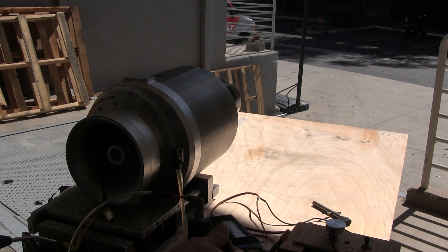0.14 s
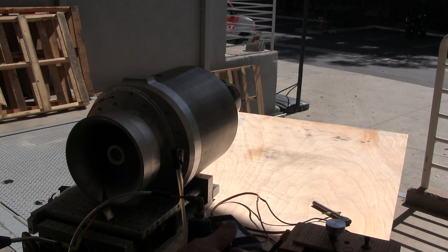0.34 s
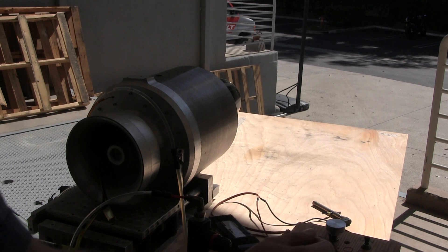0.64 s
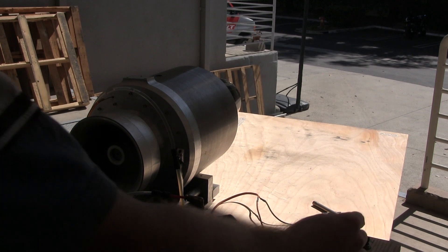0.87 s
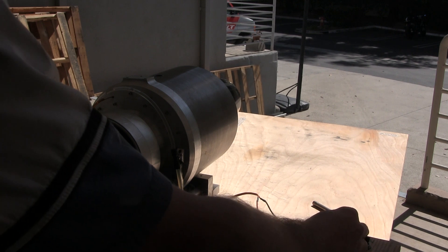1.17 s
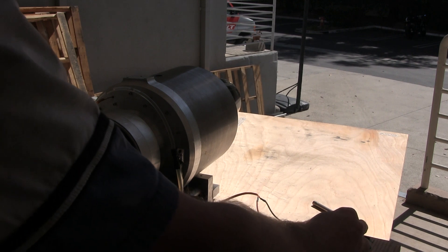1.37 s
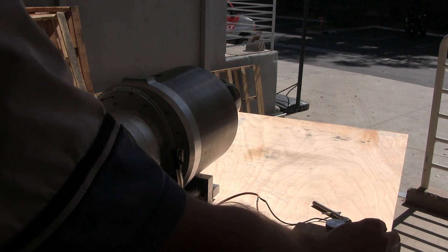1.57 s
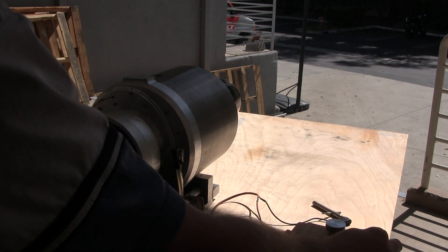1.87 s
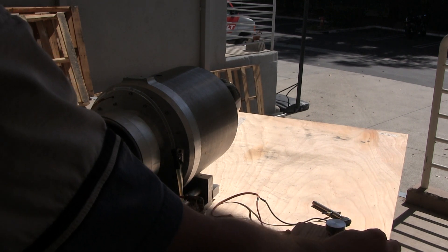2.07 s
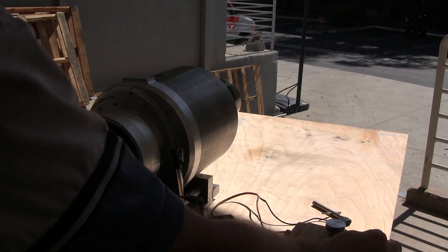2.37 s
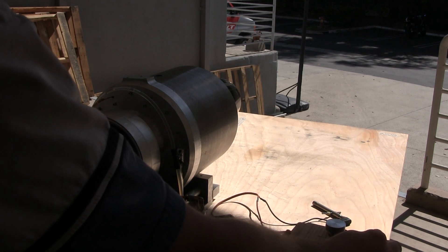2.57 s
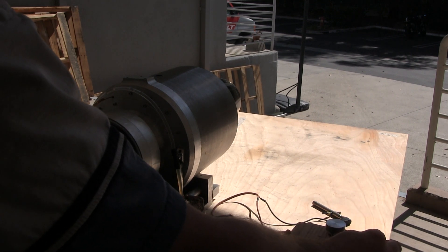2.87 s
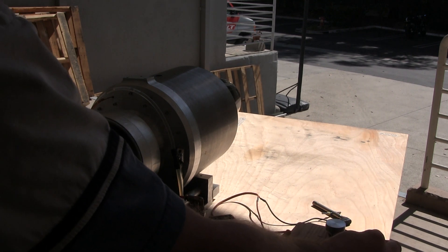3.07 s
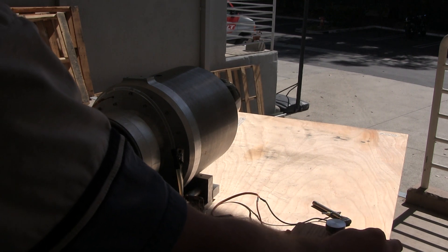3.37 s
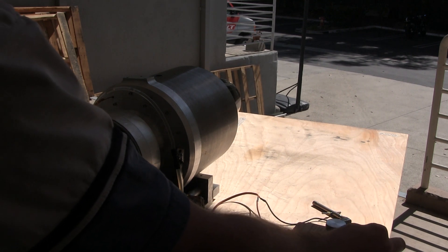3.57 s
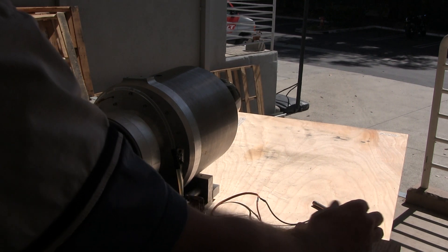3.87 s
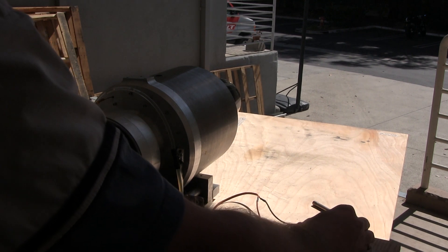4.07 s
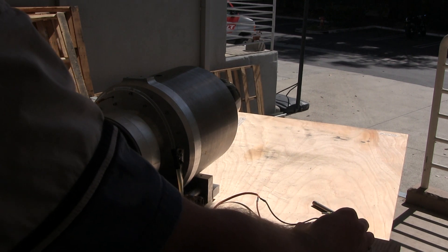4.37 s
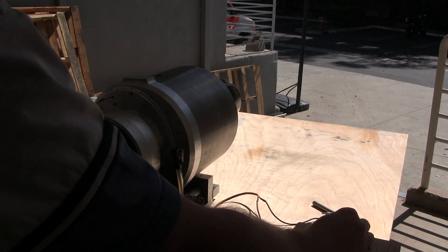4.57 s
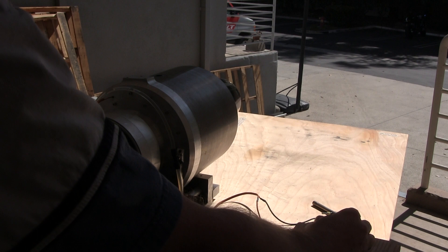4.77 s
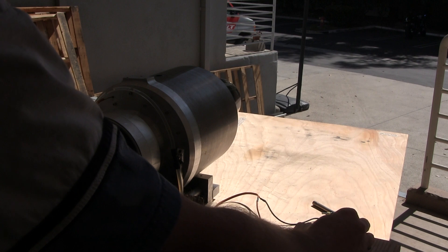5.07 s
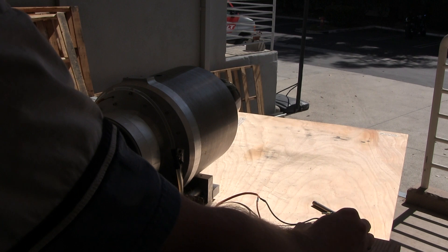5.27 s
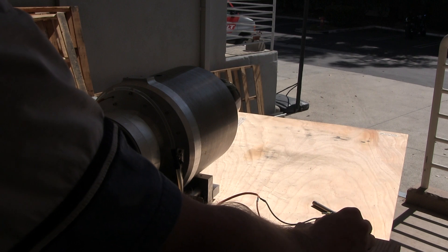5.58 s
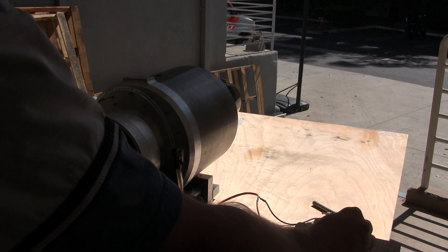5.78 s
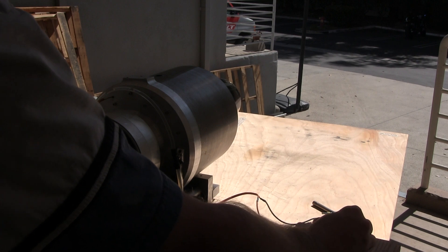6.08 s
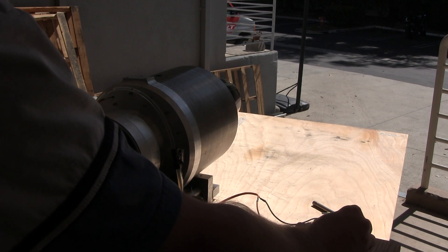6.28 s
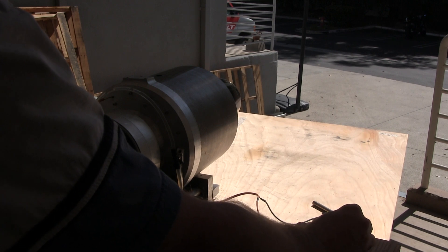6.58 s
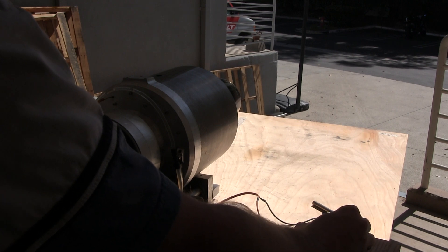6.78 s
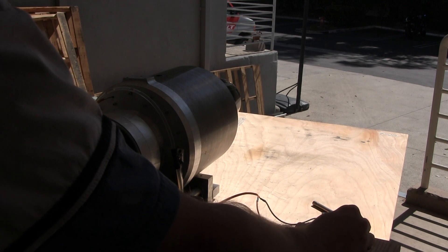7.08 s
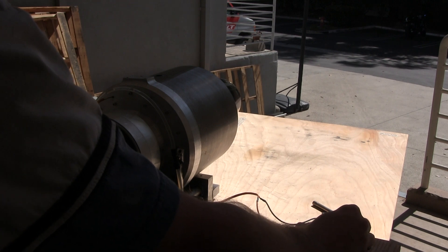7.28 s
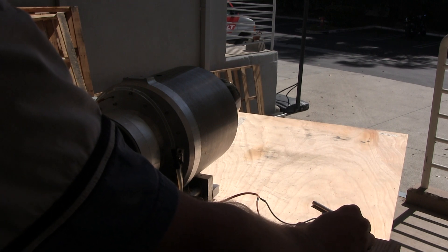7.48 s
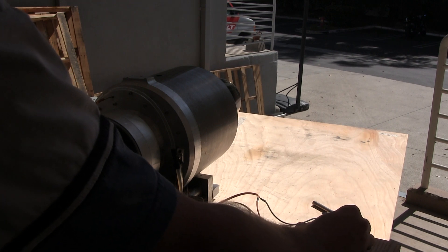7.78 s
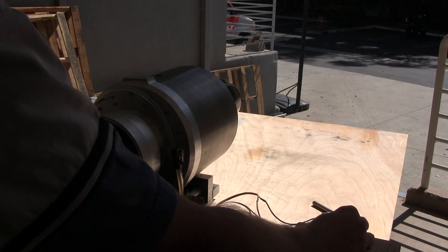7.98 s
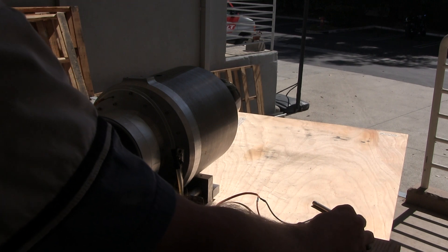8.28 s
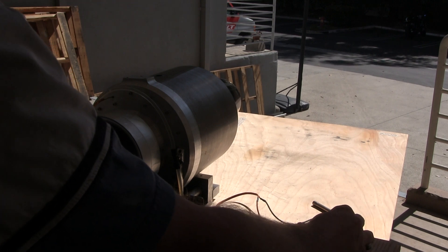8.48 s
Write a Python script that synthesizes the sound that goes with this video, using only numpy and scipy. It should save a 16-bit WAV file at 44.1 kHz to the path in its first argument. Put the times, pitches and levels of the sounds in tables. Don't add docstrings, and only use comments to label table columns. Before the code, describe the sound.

Continuous compressed-air hiss, wide and fluttering in the treble, covers a turbine's rush and soft burner rumble. After a small wooden knock, the tone shifts as a body leans in near the microphones. A thin, multi-toned whine glides upward throughout, briefly muffled then stronger, swelling as it passes resonances. Outdoors, an arm's length away, little echo, engine slightly left.

```python
import sys
import numpy as np
from scipy import signal
from scipy.fft import rfft, irfft, next_fast_len
from scipy.io import wavfile
from scipy.ndimage import uniform_filter1d

SR = 44100
rng = np.random.default_rng(int(sys.argv[2]) if len(sys.argv) > 2 else 0)


def dump_mix(stems):
    frames = np.atleast_2d(stems).T
    limited = np.clip(frames, -1, 1)
    pcm = np.round(limited * 32767).astype(np.int16)
    wavfile.write(sys.argv[1], SR, pcm)


def gain_from_db(level_db):
    decades = np.asarray(level_db, float) / 20
    return 10 ** decades


N = 381024
T = np.arange(N) / SR
SPOOL = T / T[-1]
SIZE = next_fast_len(N)
HZ = np.arange(SIZE // 2 + 1) * SR / SIZE
ARM_IN_S = 0.67
SINCE_ARM = np.maximum(T - ARM_IN_S, 0)


def on_axis(points, column=1):
    rows = np.array(points, float)
    return np.interp(np.log(HZ + 1), np.log(rows[:, 0]), rows[:, column])


def bell(x, centre, width):
    return np.exp(-0.5 * ((x - centre) / width) ** 2)


def response(points, bumps):
    db = on_axis(points) + sum(peak_db * bell(HZ, hz, width / 2) for hz, width, peak_db in bumps)
    return gain_from_db(db) / np.sqrt(np.mean(gain_from_db(db) ** 2))


def through(x, gain):
    return irfft(rfft(x, SIZE) * gain, SIZE)[..., :N]


def walk(rate_hz):
    hold = int(SR / rate_hz)
    steps = np.repeat(rng.standard_normal(N // hold + 1), hold)
    return 1.38 * uniform_filter1d(uniform_filter1d(steps, hold), hold)[:N]


def swells_db(events, width_s):
    return sum(db * bell(T, s, width_s) for s, db in events)


def knock():
    # start in seconds, peak level in dB, mode in Hz, time to fall 60 dB in seconds.
    board_modes = [
        (.4752, -17, 750, .007),
        (.4752, -27, 260, .03),
    ]
    out, t = np.zeros(N), np.arange(2000) / SR
    for s, db, hz, t60 in board_modes:
        decay = np.exp(-np.log(1000) * t / t60)
        onset = np.minimum(t / 0.0002, 1)
        start = int(s * SR)
        out[start:start + len(t)] += gain_from_db(db) * np.cos(2 * np.pi * hz * t - 0.8) * decay * onset
    return through(out, HZ ** 2 / (HZ ** 2 + 170 ** 2))


def casing_ring():
    # resonance in Hz, width in Hz, level in dB.
    resonances = [(251, 24, -44), (285, 23, -43), (310, 18, -45), (327, 14, -52), (356, 23, -51),
                  (514, 63, -43), (622, 57, -42.5), (677, 50, -40.5), (714, 11, -40.5), (750, 46, -40),
                  (811, 24, -48), (897, 32, -48.5), (940, 21, -59), (1030, 127, -43.5), (1242, 148, -35),
                  (1419, 110, -41.5), (1620, 270, -41.5), (1840, 130, -48), (1873, 210, -38),
                  (2163, 110, -45.5), (2285, 80, -50), (2540, 160, -44), (2640, 71, -55),
                  (2747, 154, -39.5), (2903, 175, -38.5), (3100, 340, -46), (3320, 310, -43.5)]
    # notch in Hz, width in Hz.
    nulls = [(294, 7), (318, 8), (572, 17), (880, 14), (1130, 16), (1470, 25), (2190, 70), (2410, 19),
             (2840, 30)]
    ring = np.sqrt(sum(gain_from_db(2 * db) / (1 + ((HZ - hz) / (width / 2)) ** 2) ** 2
                       for hz, width, db in resonances))
    for hz, width in nulls:
        ring = ring * (1 - 0.8 / (1 + ((HZ - hz) / (width / 2)) ** 2))
    return ring


def whine(cover):
    # multiple of shaft speed,
    # level in the open in dB, level behind the arm in dB, rise over the spool-up in dB.
    orders = [(.897, -58, -8.5, -1), (1, -44.5, 1.5, -7.5), (1.115, -62, -13.5, 8), (2, -51, 1.5, -3.5),
              (3, -45, 1.5, 1.5), (4, -51, -2, 2), (5, -55.5, -3, 4.5), (6, -54, -6, 9.5),
              (7, -47.5, 1, -1.5), (8, -44, -4.5, 5), (9, -66, -3.5, 2.5), (10, -48.5, -8.5, 6.5),
              (11, -58, -2, -1)]
    # centre in seconds, swell in dB.
    whine_swells = [
        (2.5, 1.6),
        (5.2, -0.9),
        (6.3, 2),
        (8.6, -1),
    ]
    top_speed_hz, spun_for_s, spool_s = 470.92, 10.405, 19.068
    hz = top_speed_hz * np.tanh((T + spun_for_s) / spool_s) * (1 + 0.0003 * walk(20))
    turns = np.cumsum(hz) / SR
    muffled_db, emerge_s = -9.5, 0.52
    effort_db = 1.5 + 3.5 * SPOOL + muffled_db * np.exp(-SINCE_ARM / emerge_s)
    effort_db = effort_db + swells_db(whine_swells, 0.24)
    ring, out = casing_ring(), 0
    for (multiple, open_db, covered_db, rise_db), start in zip(orders, rng.random(len(orders))):
        behind = np.interp(multiple * hz, HZ, ring) * gain_from_db(covered_db + rise_db * SPOOL + effort_db)
        gain = (1 - cover) * gain_from_db(open_db) + cover * behind
        tone = np.sin(2 * np.pi * (multiple * turns + start))
        out = out + np.sqrt(2) * gain * gain_from_db(walk(8)) * tone
    return out


def turbulence(rush_db, shadow_db):
    noise, out = rfft(rng.standard_normal((2, N)), SIZE), 0
    gust = 0.1 * walk(14) + 0.4 * walk(2500)
    half_octaves = np.maximum(np.log2(HZ + 1) * 2, 21)
    for band in range(21, 29):
        window = np.cos(np.pi / 2 * np.clip(half_octaves - band, -1, 1)) ** 2
        jet = np.clip((band - 23) / 2.4, 0, 1)
        flutter = gust + 0.3 * walk(9.6) + walk(400)
        db = jet * flutter + (1 - jet) * rush_db + shadow_db * (22 <= band <= 25)
        out = out + gain_from_db(db) * irfft(noise * window, SIZE)[:, :N]
    return out


def air(cover):
    # frequency in Hz, density in dB per Hz.
    air_open = [(18, -71), (30, -38.5), (231, -20), (317, -19), (482, -18.5), (1880, -20), (2140, -20),
                (5360, -7), (7340, -4.5), (8150, -1), (10900, -3.5), (12100, -0.5), (15700, -9.5)]
    # frequency in Hz, density in dB per Hz.
    air_covered = [(20, -46), (60, -39), (115, -28.5), (135, -8), (330, -22), (900, -21), (2300, -17),
                   (3800, -16), (5600, -9), (7500, -6.5), (9800, -0.5), (12500, -2), (14500, -5),
                   (15800, -11)]
    # centre in Hz, width in Hz, gain in dB.
    duct_open = [(175, 60, 13), (1850, 370, 7), (2970, 270, 6), (5400, 360, 5), (7000, 270, 3),
                 (7400, 150, -5), (8150, 650, 4.5), (9760, 500, 4.5), (11000, 730, -3.5), (11900, 600, 4),
                 (13100, 300, 0), (13800, 400, 4.5)]
    # centre in Hz, width
    # in Hz, gain in dB.
    duct_covered = [(107, 13, 7.5), (124, 12, -14), (142, 8.5, -0.5), (176.6, 45, 7.5), (229, 23, 6),
                    (710, 230, 7.5), (836, 104, -9), (1266, 138, 8), (1440, 60, 1), (1902, 390, 10),
                    (2103, 134, -9.5), (3000, 430, 7.5), (4480, 130, 4.5), (5000, 160, -4.5),
                    (5232, 320, 9.5), (5730, 150, -1.5), (5880, 110, 7.5), (6500, 150, 0.5),
                    (6670, 140, -4.5), (6773, 340, 7), (7420, 290, 3), (8050, 460, 6), (8800, 300, 1.5),
                    (9620, 590, 3.5), (10130, 250, -3.5), (11000, 400, 1.5), (11540, 300, -1),
                    (12200, 600, 2.5), (14150, 400, 0.5), (15050, 300, -4)]
    # centre in Hz, width in Hz, gain in dB.
    reaching_stance = [(5130, 170, -5), (5450, 170, 3), (6250, 230, 3.5), (8440, 360, 1), (9500, 450, -1.5),
                       (10140, 280, 3), (13500, 500, 3)]
    # frequency in Hz, density in dB per Hz.
    scatter = [(25, -50), (60, -36), (150, -24), (450, -26.5), (1050, -15.5), (1500, -32), (2450, -15),
               (4500, -19.5), (5700, -6), (7400, -3), (9800, -5), (12400, -1), (14500, -5.5), (15800, -15)]
    # centre in Hz, width in Hz, gain in dB.
    scatter_dips = [(6700, 300, -10), (8300, 790, -4), (10500, 300, -4), (13500, 500, -5)]
    # centre in seconds, surge in dB.
    surges = [
        (2.3, 1.3),
        (2.75, -0.2),
        (2.97, 0.5),
        (3.4, 0.1),
        (3.8, -.5),
        (4.75, 0.3),
        (8.0, 0.1),
    ]
    surge_db = swells_db(surges, 0.11)
    dim = SINCE_ARM / 0.32
    jet_db = -14.5 - dim * np.exp(1 - dim) + surge_db
    rush_db = 0.57 * cover + SPOOL - 1.7 * surge_db
    sweep_lag_s, sweep_s, shadow_db = 0.04, 0.45, -4.5
    sweep = np.sin(np.pi * np.clip((SINCE_ARM - sweep_lag_s) / sweep_s, 0, 1))
    shared, unshared = turbulence(rush_db, shadow_db * sweep)

    settles_s, settle_s, first_move = 4.1, 0.7, 0.72
    since = np.maximum(T - settles_s, 0)
    settled = first_move * np.minimum(since / settle_s, 1) + (1 - first_move) * since / since[-1]
    open_path = through(shared, response(air_open, duct_open))
    reaching = through(shared, response(air_covered, [*duct_covered, *reaching_stance]))
    at_rest = through(shared, response(air_covered, duct_covered))
    covered = (1 - settled) * reaching + settled * at_rest

    scattered = gain_from_db(-13) * through(unshared, response(scatter, scatter_dips))
    # Hz, dB per Hz
    wall_colour = [(40, -23), (200, 5), (1500, -5.5), (2600, -17), (16000, -33)]
    walls = gain_from_db(-30) * (1 - cover) * through(unshared, response(wall_colour, []))
    centre = (1 - cover) * gain_from_db(0.43) * open_path + cover * covered
    return gain_from_db(jet_db + 0.5) * np.array([centre, scattered + walls])


def scene():
    # frequency in Hz, left minus right in dB, lead of the left in radians.
    lean = [(60, -3.5, 0), (300, -2.1, .1), (705, -1, 0.072), (1050, 3, 0.011), (1570, -1.3, 0.022),
            (5000, 0, 0.39), (9000, 0.3, .25), (11500, 0, 0.22), (12500, 1, 0.4), (14500, 3.5, 0.31),
            (15700, 1, 0)]
    cover = 1 - np.exp(-SINCE_ARM / 0.2)
    shared, side = air(cover)
    mid = shared + whine(cover) + knock()
    tilt = gain_from_db(on_axis(lean) / 2) * np.exp(0.5j * on_axis(lean, column=2))
    return np.array([through(mid, tilt) + side, through(mid, 1 / tilt) - side])


def band_limit(x):
    return signal.sosfilt(signal.butter(12, 15840, fs=SR, output="sos"), x)


def record(dry):
    rounded = np.tanh(0.68 * dry) / 0.68
    return band_limit(through(rounded, HZ < 15730))


dry = scene()
out = record(dry)
dump_mix(out)
```